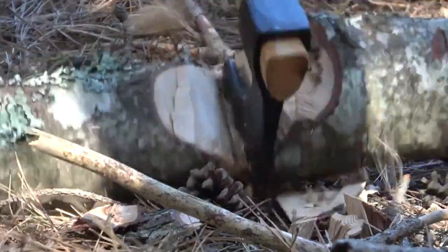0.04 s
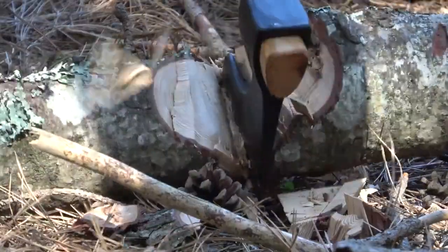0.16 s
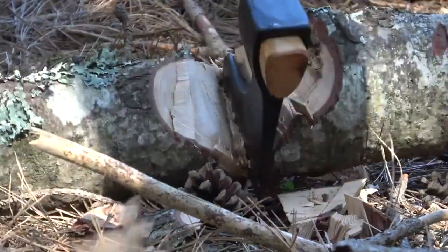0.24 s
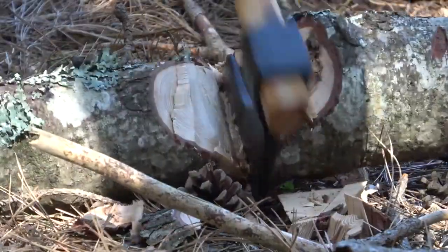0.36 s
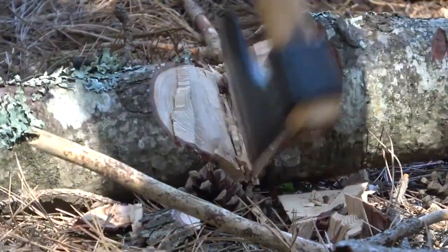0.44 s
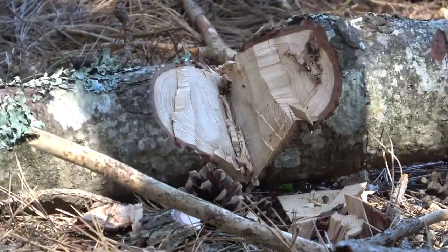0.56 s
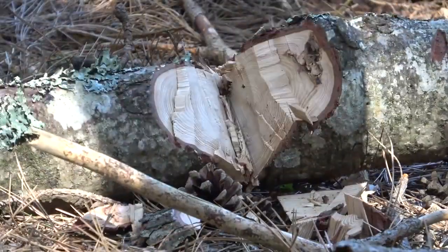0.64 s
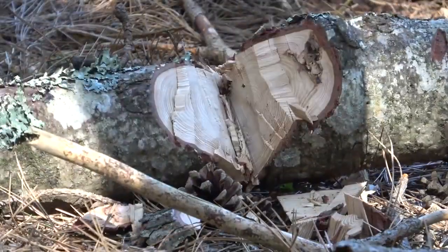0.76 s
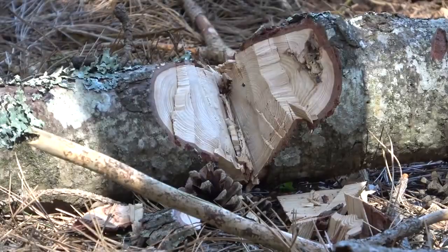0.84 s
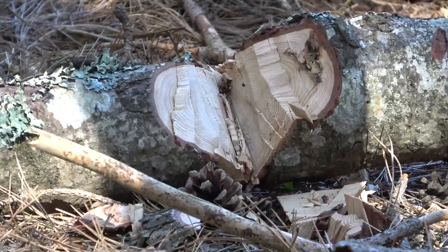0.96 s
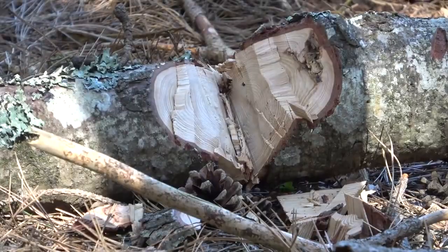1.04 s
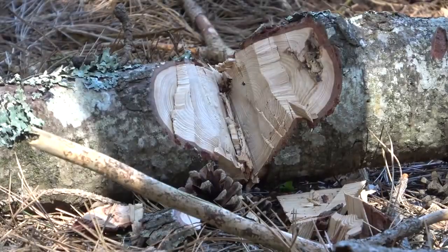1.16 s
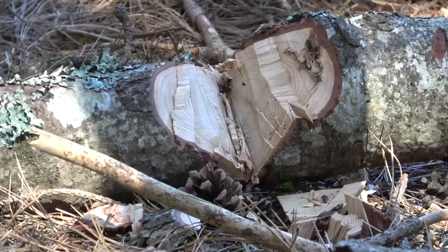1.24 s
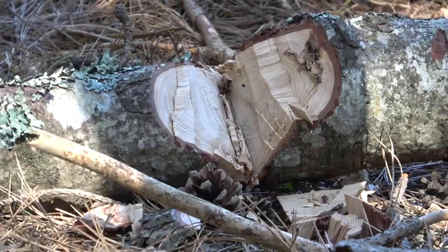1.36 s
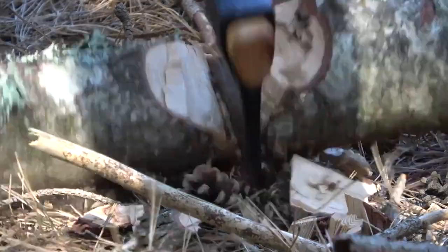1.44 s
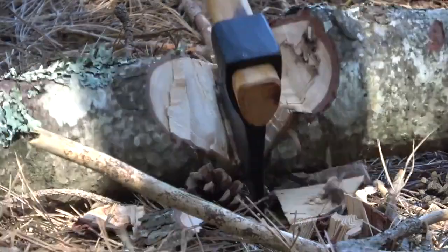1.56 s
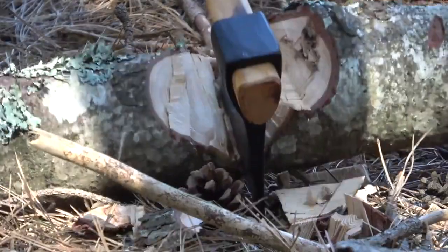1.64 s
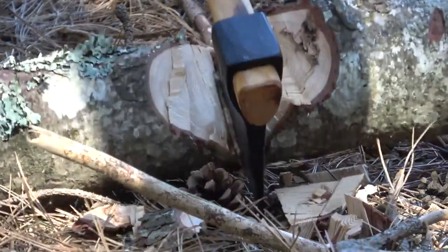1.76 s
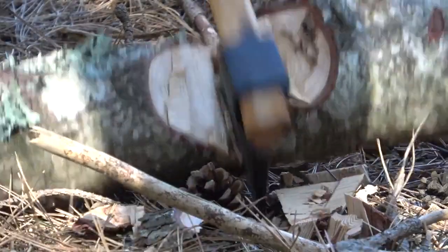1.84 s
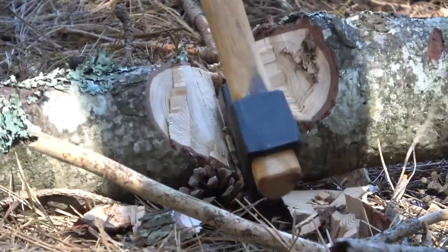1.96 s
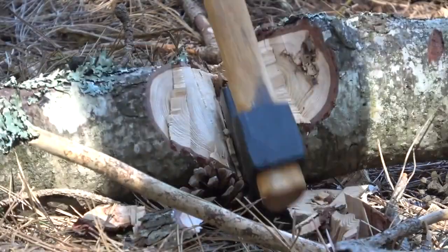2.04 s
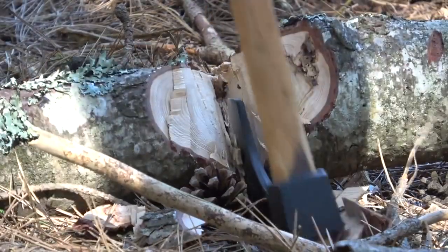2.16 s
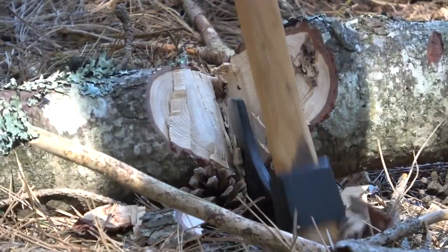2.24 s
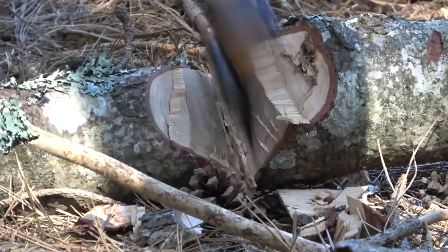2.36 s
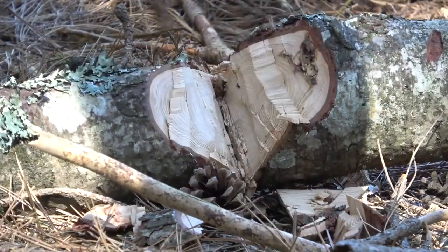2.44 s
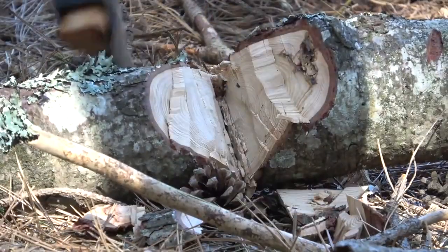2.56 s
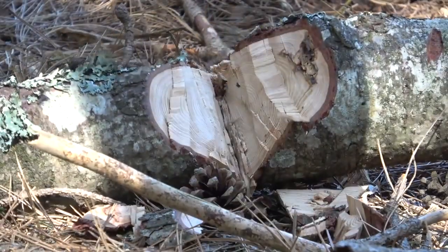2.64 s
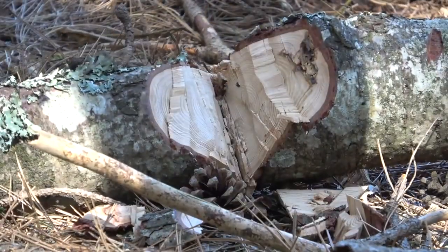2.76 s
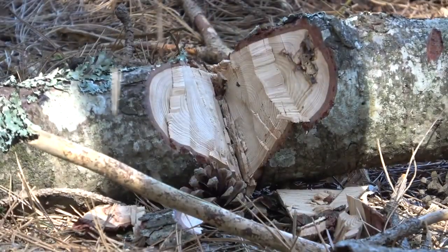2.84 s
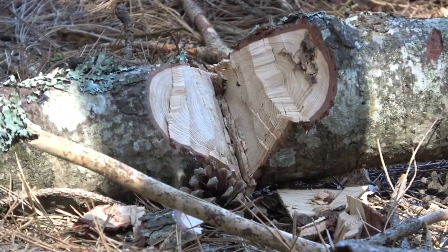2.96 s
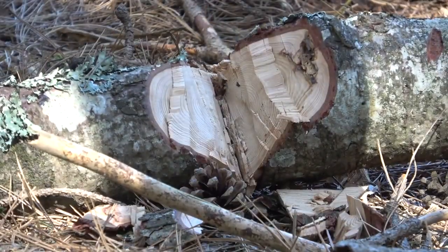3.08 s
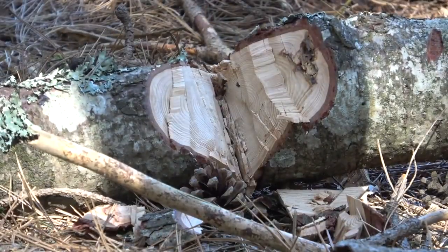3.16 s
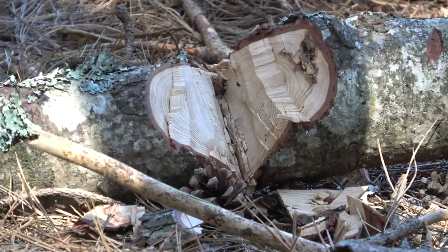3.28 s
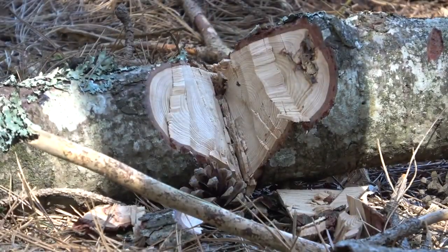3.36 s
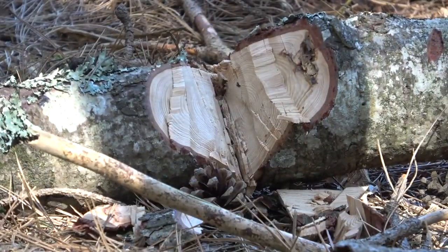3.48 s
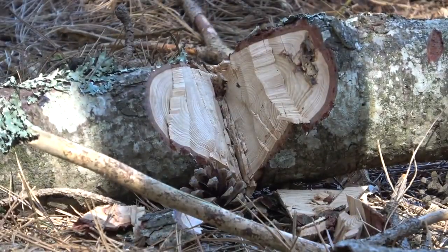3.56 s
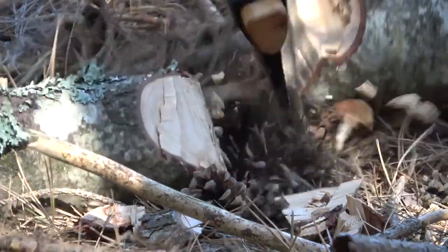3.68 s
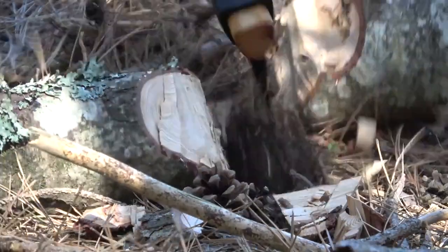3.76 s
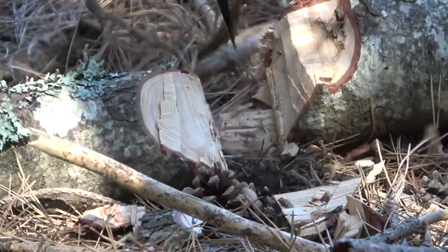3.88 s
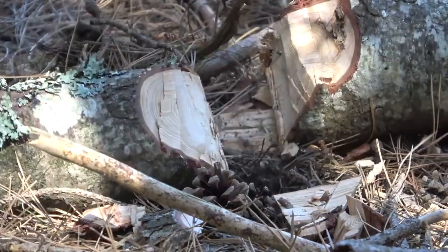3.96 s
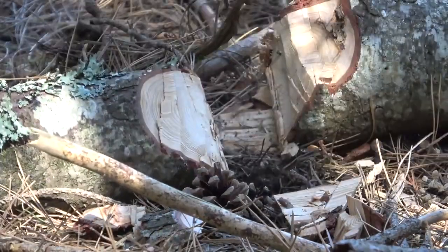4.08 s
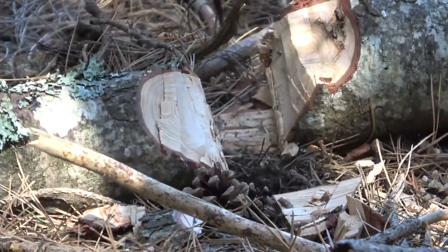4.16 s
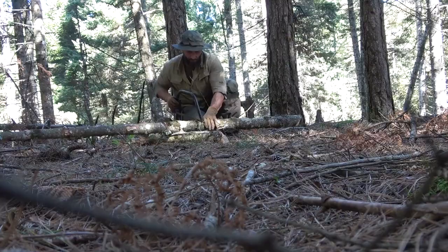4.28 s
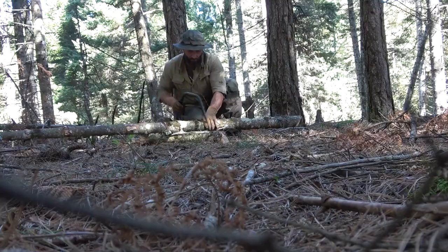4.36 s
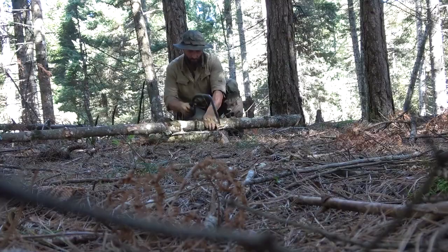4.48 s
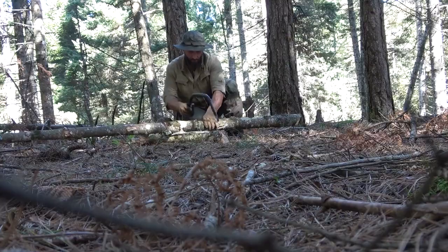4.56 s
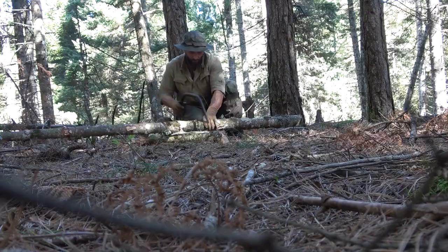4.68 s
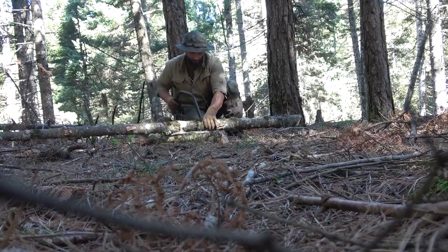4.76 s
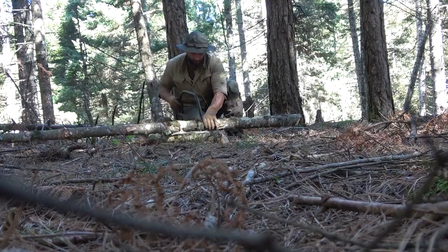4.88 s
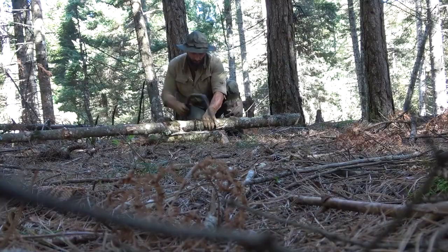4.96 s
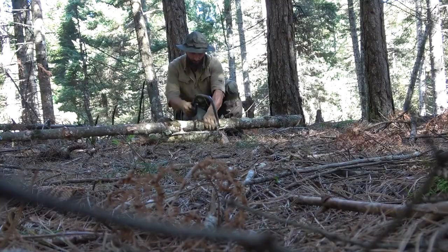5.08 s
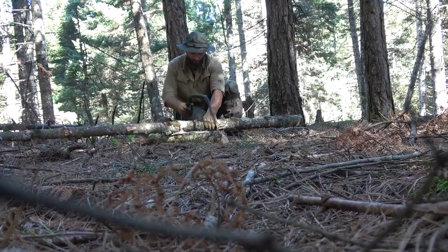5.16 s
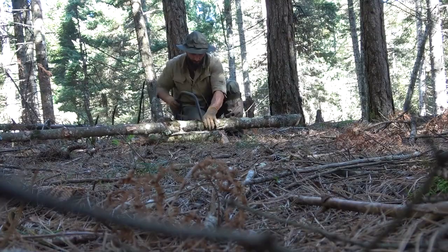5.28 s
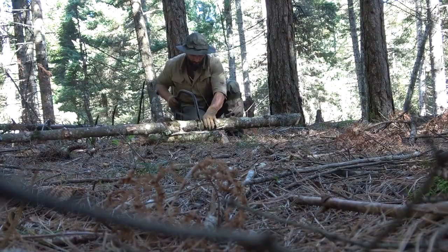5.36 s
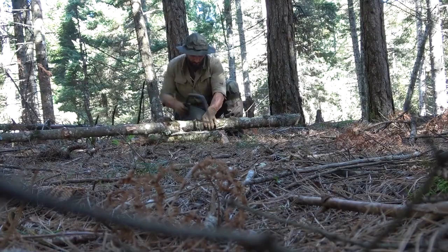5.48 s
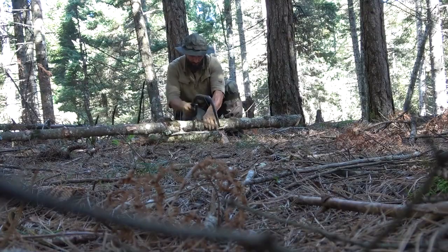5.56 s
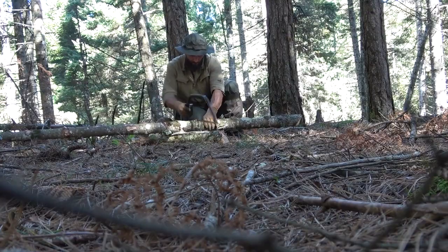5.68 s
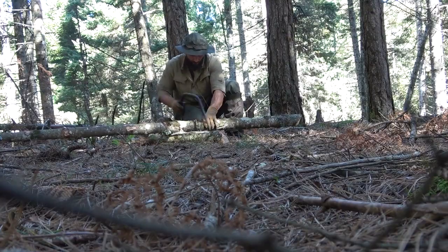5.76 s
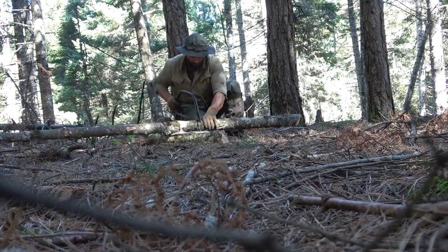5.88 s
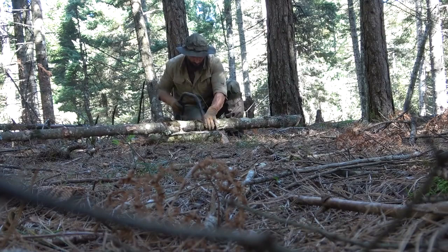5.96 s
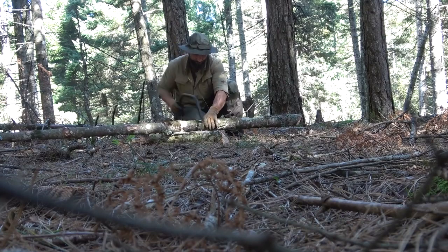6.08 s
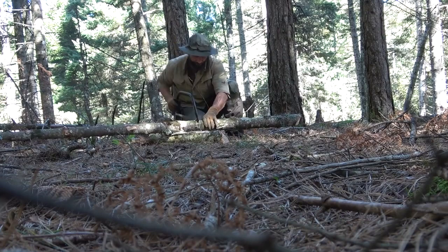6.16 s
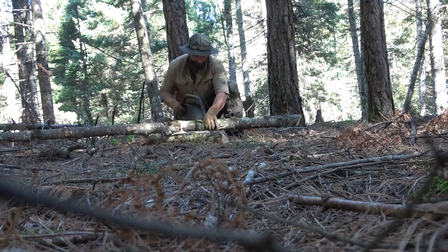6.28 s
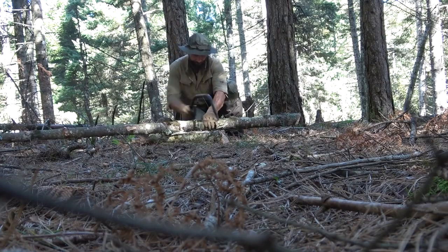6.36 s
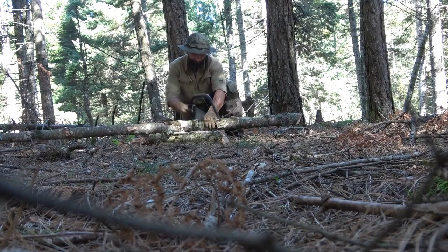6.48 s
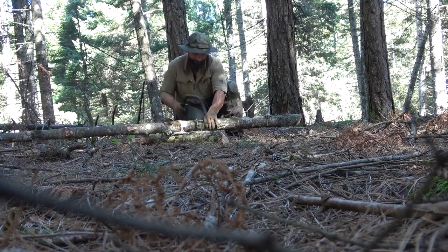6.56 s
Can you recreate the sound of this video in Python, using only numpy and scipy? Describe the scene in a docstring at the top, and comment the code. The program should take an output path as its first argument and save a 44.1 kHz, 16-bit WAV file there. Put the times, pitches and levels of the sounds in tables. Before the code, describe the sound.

An axe strikes a log at once, close by, with a sharp crack, a woody boom and a low thud that echo briefly among trees. Around 0.5 seconds the wedged blade pulls free with a tiny squeak and snaps. A second chop lands at 1.5 seconds, followed by soft rubbing and dull knocks, then a sharper woody snap and faint steel ring at 2.7. The third chop comes at 3.7 seconds, with a short low hum from the log. Chips patter faintly on dry needles after each blow. From 4.3 seconds until the end, near 6.7, a bow saw rasps through a branch in about ten strokes, nearly four a second, light and heavy in turn. The sawing is quieter than the chops, with a low buzz from the wood and a few small knocks. A very faint breeze runs throughout.

```python
"""An axe cracks into a log, which booms as the forest trunks scatter the blow back; it chops three times.
Between blows the wedged blade is worked loose with a stick-slip squeak, rubs and knocks, and chips patter.
Then a bow saw rasps through a branch, light and heavy strokes in turn, its teeth tearing the fibres
and forcing the wood to vibrate. A faint breeze in the trees lies under it all."""
import sys
import numpy as np
from scipy import signal
from scipy.fft import rfft, irfft, next_fast_len
from scipy.io import wavfile
from scipy.ndimage import uniform_filter1d

SR = 44100
rng = np.random.default_rng(int(sys.argv[2]) if len(sys.argv) > 2 else 0)


def unload_audio(sound):
    """Save the sound as a 16-bit wav file, at the path given as the first command line argument."""
    columns = np.transpose(np.atleast_2d(sound))
    # keep every value between -1 and 1, then stretch to whole-number steps
    steps = np.round(np.clip(columns, -1, 1) * 32767)
    wavfile.write(sys.argv[1], SR, steps.astype(np.int16))


N = 292383
TIME = np.arange(N) / SR
SAW_FROM_S = 4.265


def amp(db):
    """Decibels to amplitude ratio."""
    return 10 ** (np.asarray(db) / 20)


def unit(x):
    """Normalisation to an rms of 1."""
    return x / np.sqrt(np.mean(x ** 2) + 1e-20)


def add(mix, start_s, sound):
    """Superposition: sums a sound into the mix."""
    start = round(start_s * SR)
    part = mix[max(start, 0):]
    sound = sound[max(-start, 0):][:len(part)]
    part[:len(sound)] += sound


def colour(x, points, lifts=()):
    """Spectral shaping by points (frequency_hz, gain_db) and resonances (centre_hz, width_hz, lift_db)."""
    size = next_fast_len(len(x) + 2048)
    hz = np.fft.rfftfreq(size, 1 / SR)
    point_hz, point_db = np.transpose(points)
    shape_db = np.interp(np.log(hz + 1), np.log(point_hz), point_db)
    peaks_db = sum(lift / (1 + (2 * (hz - centre) / width) ** 2) for centre, width, lift in lifts)
    return irfft(rfft(x, size) * amp(shape_db + peaks_db), size)[:len(x)]


def noise(size, spectrum):
    """Coloured noise: white noise shaped by a spectrum."""
    return colour(rng.standard_normal(size), spectrum)


def band(x, lo_hz, hi_hz, order=2):
    """Causal band-pass filtering."""
    return signal.sosfilt(signal.butter(order, [lo_hz, hi_hz], "band", fs=SR, output="sos"), x)


def noise_band(size, centre_hz, width_hz, order=2):
    """Narrow-band noise of rms 1: a randomly driven resonance."""
    return unit(band(rng.standard_normal(size), centre_hz - width_hz / 2, centre_hz + width_hz / 2, order))


def grains(size, per_s, spread_db):
    """Shot noise: a random train of clicks of unequal strength."""
    strength = amp(spread_db * np.minimum(rng.exponential(1, size), 4)) * rng.choice([-1, 1], size)
    return unit(strength * (rng.random(size) < per_s / SR))


def drift(size, cutoff_hz):
    """Random modulation: low-passed noise of rms 1."""
    return unit(signal.sosfilt(signal.butter(2, cutoff_hz, fs=SR, output="sos"), rng.standard_normal(size)))


def steadied(x, window_s):
    """Envelope normalisation: holds a vibration near rms 1, so that its driving force sets the level."""
    size = int(window_s * SR)
    power = uniform_filter1d(uniform_filter1d(x ** 2, size), size)
    return x / np.sqrt(abs(power) + 1e-12)


def surge(t, rise_db_per_s, t60_s):
    """Exponential growth to 1 at t = 0, then exponential decay."""
    return amp(rise_db_per_s * np.minimum(t, 0) - 60 * np.maximum(t, 0) / t60_s)


def bounce(x, strength, within_s, count=6):
    """Interference: a few short reflections carve random peaks and notches into the spectrum."""
    out = x.copy()
    for delay_s, sign in zip(rng.uniform(.1, 1, count) * within_s, rng.choice([-1, 1], count)):
        add(out, delay_s, x * sign * strength)
    return out / np.sqrt(1 + count * strength ** 2)


def patchy(x, depth_db=2):
    """Transient resonance: random spectral peaks come and go, as when fibre bundles ring briefly."""
    spectra = signal.stft(x, nperseg=256, noverlap=192)[2]
    patches = uniform_filter1d(rng.standard_normal(spectra.shape), size=3, axis=0)
    patches = unit(uniform_filter1d(patches, size=16, axis=1))
    return signal.istft(spectra * amp(depth_db * patches), nperseg=256, noverlap=192)[1][:len(x)]


# spectrum of the wind: frequency_hz, gain_db
WIND_SPECTRUM = [(15, -61.5), (25, -32), (64, -3), (99, -7.5), (277, -14.5), (427, -7), (489, -9.5),
                 (641, -2.5), (734, -19), (796, -8), (936, -11), (1020, -13), (1330, -7), (1610, -25.5),
                 (16000, -31.5)]
def breeze(wind_db=-59.5, swell_db=1.6, hiss_db=-71.5):
    """Flow noise: nearly steady wind in the crowns, over an even hiss."""
    wind = unit(noise(N, WIND_SPECTRUM)) * amp(wind_db + swell_db * drift(N, 3.2))
    return wind + amp(hiss_db) * rng.standard_normal(N)


def echo_envelope(t, peak_s=0.047, rise_db_per_s=111):
    """Reverberant decay: the echo builds up, then dies fast from near trunks and slowly from far ones."""
    near = amp(-2.5) * surge(t - peak_s, rise_db_per_s, t60_s=0.43)
    far = amp(-16.5) * surge(t - peak_s, rise_db_per_s, t60_s=1.336)
    return np.hypot(near, far)


def forest_reverb(x, wet_db=-17):
    """Convolution with many trunk reflections gives small close sounds a faint echo."""
    taps = grains(SR, per_s=3000, spread_db=2.9) * echo_envelope(np.arange(SR) / SR)
    return amp(wet_db) * signal.fftconvolve(x, taps / np.linalg.norm(taps))[:N]


def flanks(x, spectrum):
    """Early lateral reflections from the ground and trunks."""
    t = np.arange(SR // 16) / SR
    taps = grains(len(t), per_s=4000, spread_db=1) * surge(t, 0, t60_s=0.085)
    return colour(signal.oaconvolve(x, taps / np.linalg.norm(taps))[:N], spectrum)


def falling_chips(flight_s=0.19, level_db=-58):
    """Random impacts: chips thrown by each chop land on dry needles, fainter as time passes."""
    shower = sum(surge(TIME - start_s - flight_s, 120, t60_s=1.7) for start_s, *_ in AXE_BLOWS)
    patter = bounce(grains(N, per_s=76, spread_db=4), strength=.5, within_s=.004)
    return unit(band(patter, 3000, 9000, order=1)) * shower * amp(level_db)


# rubs of the axe blade in the cut: middle_s, length_s, level_db
BLADE_RUBS = [(.49, 0.21, -50.5), (1.95, 0.25, -51), (2.213, 0.26, -52), (2.533, 0.28, -53),
              (2.709, 0.11, -46.5)]
# spectra of dry litter and of the log under the rubbing blade: frequency_hz, gain_db
LITTER_SPECTRUM = [(300, 2.5), (1500, 2.5), (3500, -5), (7000, -5), (16000, -27)]
RUBBED_LOG_SPECTRUM = [(80, -12.5), (220, -0.5), (480, -1), (1000, -13), (3000, -34)]
def rustle(stir_db=-44, rest_db=-64.5, crumbs_db=-8.5, body_db=-9):
    """Friction noise: each swing stirs the litter, and the blade rubs the bark over a dull log tone."""
    stirs = [amp(stir_db) * surge(TIME - start_s, 203, t60_s=0.69) for start_s, *_ in AXE_BLOWS]
    arches = [amp(db) * np.exp(-(2 * (TIME - middle_s) / length_s) ** 2)
              for middle_s, length_s, db in BLADE_RUBS]
    rub = np.linalg.norm(arches, axis=0)
    level = np.linalg.norm(stirs + [rub, amp(rest_db) * (TIME < SAW_FROM_S)], axis=0)
    crumbs = bounce(grains(N, per_s=93, spread_db=2.4), strength=0.55, within_s=.003)
    crumbs = amp(crumbs_db) * unit(band(crumbs, 2240, 9000, order=1))
    needles = unit(colour(grains(N, per_s=5000, spread_db=3), LITTER_SPECTRUM))
    body = amp(body_db) * unit(noise(N, RUBBED_LOG_SPECTRUM))
    return (needles + crumbs) * level + body * rub


# chips and bark snapping: start_s, level_db, centre_hz, t60_s
BARK_SNAPS = [(.447, -34, 4500, .022), (.4742, -13.5, 7000, .003), (0.4843, -21.5, 4500, 0.016),
              (.488, -26, 3070, 0.037), (.8103, -44.5, 5030, .011), (1.383, -29, 4340, 0.005),
              (1.938, -35, 5100, .017), (1.993, -41, 2980, .032), (2.1634, -40, 2200, 0.041),
              (2.2243, -42, 2500, 0.037), (2.2638, -31, 7000, 0.0063), (2.6898, -32, 2530, 0.036),
              (2.7028, -14.5, 3600, 0.0089), (2.7037, -22.5, 830, .014), (2.7048, -23.5, 2200, 0.039),
              (2.8984, -39, 6420, 0.0092), (2.964, -47.5, 1720, 0.086), (3.01, -35, 7430, 0.0093),
              (4.303, -33, 4520, .02), (4.861, -32, 4520, 0.011)]
def snaps(band_ratio=1.46):
    """Brittle fracture: tearing fibres release brief bursts of noise."""
    out, t = np.zeros(N), np.arange(SR // 4) / SR
    for start_s, db, hz, t60_s in BARK_SNAPS:
        fibres = band(rng.standard_normal(len(t)), hz / band_ratio, hz * band_ratio, order=1)
        fibres = bounce(band(fibres, 200, 9600, order=1), strength=.6, within_s=.0025)
        add(out, start_s, steadied(fibres, .0044) * amp(db - 60 * t / t60_s))
    return out


def mode(hz, db, t60_s):
    """Damped harmonic oscillation: one dying sine."""
    t = np.arange(SR // 2) / SR
    return amp(db - 60 * t / t60_s) * np.sin(2 * np.pi * hz * t)


# dull knocks of wood: start_s, level_db, pitch_hz, t60_s
WOOD_KNOCKS = [(.459, -38.5, 765, .05), (.482, -38, 560, 0.056), (1.407, -37, 570, 0.026),
               (1.965, -36, 227.8, 0.13), (1.992, -35.5, 297, .075), (2.014, -39, 257, 0.085),
               (2.117, -39, 294, 0.089), (2.232, -44, 282, 0.094), (2.347, -49.5, 337, 0.12),
               (2.69, -30.5, 447, .04), (2.7012, -17.5, 391, 0.034), (2.704, -30.5, 66.6, .14),
               (2.706, -22, 163, 0.049), (2.719, -40.5, 322, 0.18), (3.842, -27.5, 1294, 0.044),
               (4.861, -31, 221, 0.035), (4.904, -27.5, 124, 0.036), (5.703, -24.5, 315, 0.061),
               (5.846, -33.5, 450, 0.048), (6.13, -31.5, 120, 0.035), (6.2441, -18.5, 270, .025),
               (6.246, -31, 153.5, 0.091), (6.535, -29.5, 242, 0.028)]
# modes of one knock: pitch_ratio, gain_db
WOOD_MODES = [(.68, -5), (1, 0), (1.3, -4), (1.72, -7.5), (2.3, -25)]
def knocks():
    """Modal vibration: struck wood sounds a few heavily damped, inharmonic modes."""
    out = np.zeros(N)
    for start_s, db, hz, t60_s in WOOD_KNOCKS:
        for k, (ratio, gain_db) in enumerate(WOOD_MODES):
            add(out, start_s, (-1) ** k * mode(hz * ratio, db + gain_db, t60_s))
    return out


# ringing of the axe head and the log: start_s, level_db, pitch_hz, t60_s
RING_TONES = [(.511, -51, 6600, 0.16), (2.406, -54, 3420, .12), (2.597, -51.5, 3380, 0.18),
              (2.601, -51.5, 5490, 0.15), (2.717, -43, 6640, 0.25), (3.774, -22, 186.5, 0.19),
              (3.85, -44, 6660, 0.35)]
def rings(beat_hz=17, twin_db=-7):
    """Beating of two close modes: the steel head rings as it comes free, the log hums as it parts."""
    out = np.zeros(N)
    for start_s, db, hz, t60_s in RING_TONES:
        add(out, start_s, mode(hz, db, t60_s) + mode(hz + beat_hz, db + twin_db, t60_s))
    return out


# course of the squeak: time_s, level_db, slip_rate_hz
SQUEAK_PATH = [(0.456, -32, 490), (.459, -29, 550), (0.465, -32, 800), (0.471, -29, 720), (0.479, -33, 250)]
# spectrum of the squeak: frequency_hz, gain_db
SQUEAK_SPECTRUM = [(300, -15), (1500, -14), (2400, -2), (3000, 1), (4200, -4), (6000, -3), (8000, -13),
                   (16000, -38.5)]
def squeak(jitter=.14):
    """Stick-slip friction: the wedged blade gives one pulse per slip as it is pulled free."""
    time_s, db, rate_hz = np.transpose(SQUEAK_PATH)
    out, t = np.zeros(N), np.arange(time_s[0], time_s[-1], 1 / SR)
    cycles = np.cumsum(np.interp(t, time_s, rate_hz) * (1 + jitter * drift(len(t), 400))) / SR
    slips = unit(np.diff(np.floor(cycles), prepend=0)) * amp(2 * drift(len(t), 400))
    slips += 0.29 * rng.standard_normal(len(t))
    tone = colour(bounce(slips, strength=0.4, within_s=.0012), SQUEAK_SPECTRUM)
    add(out, time_s[0], unit(tone) * amp(np.interp(t, time_s, db)))
    return out


def stroke_pressure_db(t, swell_s, hold_s, lean_db, turn_s, run_out_db_per_s=105):
    """Driving force of a saw stroke: it slides in, bites at t = 0, swells, holds and lifts."""
    lifted_s = swell_s + hold_s + 0.03
    slide = [(-2 * turn_s, -52), (-turn_s, -26), (-.005, -17.5)]  # time_s, level_db
    cut = [(0, -12), (swell_s, -lean_db / 2), (swell_s + hold_s, lean_db / 2), (lifted_s, lean_db / 2 - 12)]
    return np.interp(t, *np.transpose(slide + cut)) - run_out_db_per_s * np.maximum(t - lifted_s, 0)


# spectrum of the tearing fibres: frequency_hz, gain_db
RASP_SPECTRUM = [(410, -37), (700, -12.5), (898, -17), (1140, -11), (1800, -8.5), (2100, -1), (2530, -7.5),
                 (2800, -2), (3410, -7.5), (5690, 0), (11500, -13), (13000, -14), (16000, -20.5)]
# resonances of the saw blade: centre_hz, width_hz, lift_db
BLADE_RESONANCES = [(2140, 270, -1.5), (2790, 320, 3.5), (5340, 480, -2)]
def rasp(teeth, regular, tooth_depth=0.16, flutter_db=1.27):
    """Amplitude-modulated shot noise: fibres tear as each tooth bites, and the blade colours the sound."""
    size = len(teeth)
    tearing = grains(size, per_s=12000, spread_db=1.6) * (1 + tooth_depth * np.sqrt(regular) * teeth)
    tearing *= amp(flutter_db * drift(size, 58))
    tearing += .33 * grains(size, per_s=170, spread_db=3)  # snags on tough fibres
    tearing = colour(patchy(tearing), [(2000, 0), (10000, -3)])
    return unit(colour(tearing, RASP_SPECTRUM, BLADE_RESONANCES))


# spectrum of the shaken branch: frequency_hz, gain_db
BRANCH_SPECTRUM = [(25, -24), (100, -11), (190, -8.5), (290, -3), (370, -1.5), (480, -0.5), (570, -7.5),
                   (680, -46), (1000, -18), (3000, -58)]
def branch(teeth, regular):
    """Forced vibration: even teeth drive the branch at the tooth rate, uneven ones make it rumble."""
    rumble = steadied(noise(len(teeth), BRANCH_SPECTRUM), 0.11)
    tone = amp(2 * drift(len(teeth), 33)) * teeth
    return np.sqrt(2 * regular) * tone + np.sqrt(1 - regular) * rumble


# saw strokes, light and heavy in turn (lean is the pressure change over the hold, regularity is 0-1):
# bite_s, swell_s, hold_s, rasp_db, lean_db, catch_db, branch_db, top_tooth_rate_hz, regularity
SAW_STROKES = [(4.266, 0.0028, 0.043, -41, -0.5, -40, -44.5, 450, 0),
               (4.436, 0.069, 0.067, -31, -2.5, -33, -37, 340, 0.32),
               (4.703, 0.022, 0.15, -38, -0.5, -55, -44, 480, 0.06),
               (4.983, 0.077, 0.0708, -30.5, -4, -43, -36.5, 356, 0.73),
               (5.259, 0.018, 0.12, -35, 3, -47, -41.5, 470, 0),
               (5.509, 0.067, 0.07, -29.5, 3.5, -39, -36.5, 346, 0.73),
               (5.783, 0.0234, 0.12, -35, 0.5, -55, -41, 490, 0.23),
               (6.045, 0.053, 0.11, -30, -6, -44, -35, 380, 0.68),
               (6.339, 0.065, 0.072, -26, 2, -42, -38.5, 360, 0.52),
               (6.604, 0.021, 0.085, -35.5, -8, -55, -42.5, 470, 0.1)]
def saw(lead_s=0.01204, coast_s=0.0753, turn_s=0.049, turn_db=-4, jitter=0.042, zing_db=-41):
    """Periodic excitation: teeth pass at a rate that arches with each stroke, driving rasp and branch."""
    out, turning = np.zeros(N), np.zeros(N)
    t = np.arange(-SR // 12, 2 * SR // 5) / SR
    for bite_s, swell_s, hold_s, rasp_db, lean_db, catch_db, branch_db, top_hz, regularity in SAW_STROKES:
        pressure_db = stroke_pressure_db(t, swell_s, hold_s, lean_db, turn_s)
        progress = np.clip((t + lead_s) / (lead_s + swell_s + hold_s + coast_s), 0, 1)
        rate_hz = top_hz * abs(np.sin(np.pi * progress)) ** 0.7 * (1 + jitter * drift(len(t), 78))
        teeth = np.cos(2 * np.pi * np.cumsum(rate_hz) / SR)
        # the teeth run evenly only while the blade is up to speed; otherwise it hops
        regular = regularity * np.exp(-((progress - .4) / 0.27) ** 4)
        judder = (1 - regular) * drift(len(t), 41)
        catch = amp(catch_db) * surge(t, 0, t60_s=0.033) * (t >= 0)
        cutting = rasp(teeth, regular) * np.hypot(amp(rasp_db + pressure_db + 0.95 * judder), catch)
        dull = band(cutting, 30, 5800, order=1)
        cutting = dull + (cutting - dull) * amp(0.15 * pressure_db)  # more pressure, more treble
        shaking = branch(teeth, regular) * amp(branch_db + 0.94 * pressure_db + 2.5 * judder)
        # the blade sings when the teeth run evenly
        zing = noise_band(len(t), centre_hz=12950, width_hz=450) * regular ** 3 * amp(zing_db)
        add(out, bite_s + t[0], cutting + shaking + zing)
        # the level dips as the blade turns round before each bite
        add(turning, bite_s + t[0], np.exp(-((t + turn_s) / 0.019) ** 2))
    return out * amp(turn_db * turning) * (TIME >= SAW_FROM_S)


# spectrum of a blow's first shock: frequency_hz, gain_db
JOLT_SPECTRUM = [(60, -12), (300, 5), (600, -3), (1500, -22), (3500, -18.5), (8000, -48)]
def jolts():
    """Interaural difference: the first shock of each chop arrives differently on the left and right."""
    out, t = np.zeros(N), np.arange(-SR // 50, SR // 5) / SR
    for start_s, *_, jolt_db in AXE_BLOWS:
        shock = steadied(noise(len(t), JOLT_SPECTRUM), .01)
        add(out, start_s + t[0], shock * amp(jolt_db) * surge(t, 2505, t60_s=0.028))
    return out


# spectra sent into the forest, one list per chop: frequency_hz, gain_db
ECHO_SPECTRA = [
    [(120, -26), (200, -2.5), (465, -1), (509, -4), (635, -1.5), (1000, -2), (1650, -1.5), (2090, -7),
     (2860, 1), (3690, -8.5), (4520, -5), (5130, -12.5), (11900, -21), (16000, -35)],
    [(120, -28), (200, -4), (440, -7.5), (659, -2.5), (1080, -9), (1620, -7.5), (2290, -10.5), (13100, -31),
     (16000, -48)],
    [(120, -33), (200, -7), (366, -7), (548, -8.5), (986, -7), (1080, -8), (1450, -10), (1770, -9.5),
     (2170, -10.5), (4770, -14.5), (14600, -33), (16000, -57)],
]
def trunk_scatter(t, blow, treble_loss_db_per_s=14):
    """Scattering and absorption: trunks return dense echoes; air and foliage dull the longer paths."""
    echoes = colour(grains(len(t), per_s=6000, spread_db=1.4), ECHO_SPECTRA[blow])
    echoes *= amp(0.2 * drift(len(t), 123))
    echoes = unit(band(patchy(echoes), 150, 17540))
    dull = band(echoes, 30, 1800, order=1)
    return dull + (echoes - dull) * amp(-treble_loss_db_per_s * np.maximum(t, 0))


# spectrum of the forest floor: frequency_hz, gain_db
GROUND_SPECTRUM = [(20, -25), (40, -9), (70, -1), (120, -0.5), (180, -11.5), (300, -44), (800, -76)]
def ground_thud(t, t60_s=0.52):
    """Impact transmission: the blow shakes the ground into a low, dying rumble."""
    onset = np.clip((t + 0.0086) / 0.018, 0, 1)
    return steadied(noise(len(t), GROUND_SPECTRUM), 0.036) * onset * surge(t, 0, t60_s)


# modes of the log: pitch_hz, level_db
LOG_MODES = [(182, -8), (224, -5), (298, -4), (355, -4), (422, 2), (512, -3.5), (642, -8.5)]
# shoves as the edge lands and as the cheeks wedge in: delay_s, level_db, rise_db_per_s, t60_s
LOG_SHOVES = [(-.003, -4.5, 1902, 0.056), (.021, 2.5, 1502, 0.089)]
def log_boom(t, tilt_db_per_octave, waver=0.052, shudder_db=-18):
    """Resonance: two shoves drive the log's modes, which waver as blade and ground press on the wood."""
    shaking = np.zeros(len(t))
    for hz, db in LOG_MODES:
        cycles = np.cumsum(hz * (1 + waver * drift(len(t), 50))) / SR + rng.random()
        shaking += amp(db + tilt_db_per_octave * np.log2(hz)) * np.sin(2 * np.pi * cycles)
    shoves = sum(amp(db) * surge(t - delay_s, rise, t60_s) for delay_s, db, rise, t60_s in LOG_SHOVES)
    last_s, _, last_rise, _ = LOG_SHOVES[-1]
    shudder = amp(shudder_db) * surge(t - last_s, last_rise, t60_s=.17)
    return steadied(shaking, 0.012) * (shoves + shudder)


# spectrum of the cracking fibres: frequency_hz, gain_db
CRACK_SPECTRUM = [(100, 5), (350, 20.5), (900, 5), (3000, 1.5), (8000, -3), (16000, -20.5)]
# blows of the axe: start_s, crack_db, boom_db, boom_tilt_db_per_octave, echo_db, thud_db, jolt_db
AXE_BLOWS = [(0.0252, -10.5, -14, 1.5, -15, -24, -21), (1.4774, -13, -12, -4, -15, -24.5, -14),
             (3.675, -9, -16.5, -8, -17, -25, -18)]
def chops(crack_t60_s=0.024, split_db=-24):
    """Impulsive excitation: the blade cracks the fibres and shakes log and ground; the trunks answer."""
    out, t = np.zeros(N), np.arange(-SR // 50, 3 * SR // 2) / SR
    tail = echo_envelope(t) * np.where(t < 0, amp(-4.5 + 1400 * np.minimum(t, 0)), 1)
    for blow, (start_s, crack_db, boom_db, tilt, echo_db, thud_db, _) in enumerate(AXE_BLOWS):
        crack = amp(crack_db) * unit(noise(len(t), CRACK_SPECTRUM)) * surge(t, 0, crack_t60_s) * (t >= 0)
        boom = amp(boom_db) * log_boom(t, tilt)
        thud = amp(thud_db) * ground_thud(t)
        echo = amp(echo_db) * trunk_scatter(t, blow) * tail
        add(out, start_s + t[0], crack + boom + thud + echo)
    # the wood rings after the first cut
    split_ring = noise_band(len(t), centre_hz=2640, width_hz=580, order=5)
    add(out, AXE_BLOWS[0][0] + t[0], amp(split_db) * split_ring * tail)
    return out


# side-channel spectra of axe, saw and breeze: frequency_hz, gain_db
AXE_SIDE = [(50, -18), (300, -20.5), (900, -16.5), (2000, -20), (3700, -29), (5500, -9), (8000, -4.5),
            (14000, -7.5)]
SAW_SIDE = [(50, -19), (300, -20), (900, -24), (2500, -60), (6000, -55), (14000, -54)]
BREEZE_SIDE = [(60, -20), (150, -3.5), (380, -8), (950, -9.5), (2380, -28), (5980, 2.5), (15000, -6)]
def scene(close_side_db=-19):
    """Mid-side stereo: all sources lie straight ahead; decorrelated sound from the flanks gives width."""
    axe, sawing = chops(), saw()
    close = snaps() + knocks() + rings() + squeak() + rustle() + falling_chips()
    mid = axe + sawing + breeze() + close + forest_reverb(close)
    side = jolts() + flanks(axe, AXE_SIDE) + flanks(sawing, SAW_SIDE) + colour(breeze(), BREEZE_SIDE)
    side += amp(close_side_db) * bounce(close, strength=1, within_s=.008)
    return np.array([mid + side, mid - side])


def record(dry, low_cut_hz=35, ceiling=.75, high_cut_hz=16000):
    """Transducer response: the microphone's bass roll-off, soft saturation of peaks, then a band limit."""
    thinned = signal.sosfilt(signal.butter(2, low_cut_hz, "high", fs=SR, output="sos"), dry)
    limited = thinned / (1 + (thinned / ceiling) ** 4) ** .25
    low_pass = signal.firwin(511, high_cut_hz, window=("kaiser", 9), fs=SR)
    return signal.oaconvolve(limited, low_pass[None], "same")


dry = scene()
out = record(dry)
unload_audio(out)
```